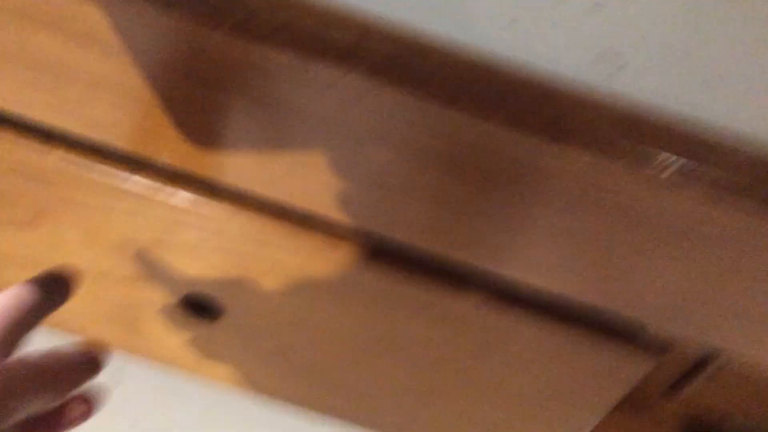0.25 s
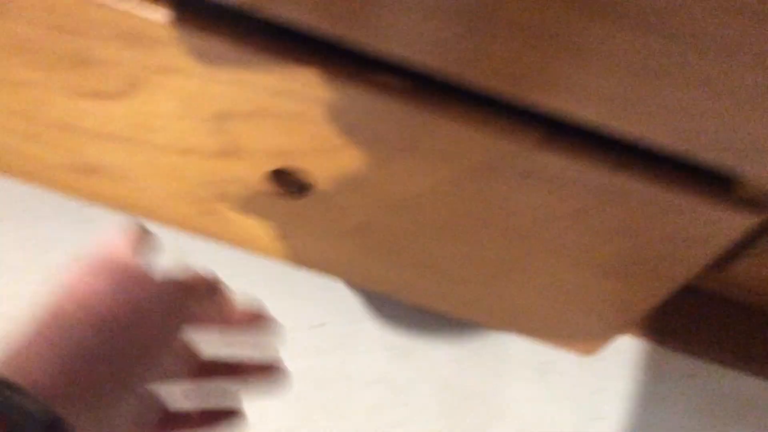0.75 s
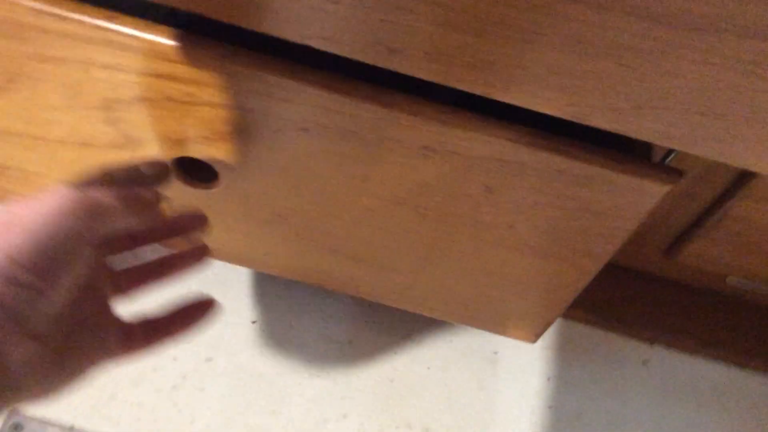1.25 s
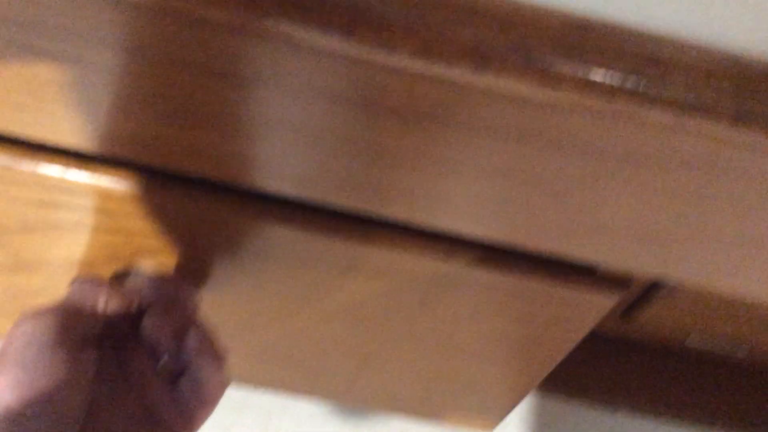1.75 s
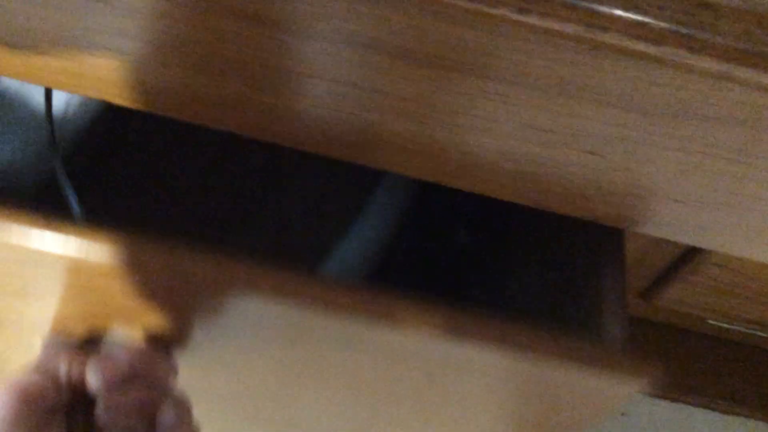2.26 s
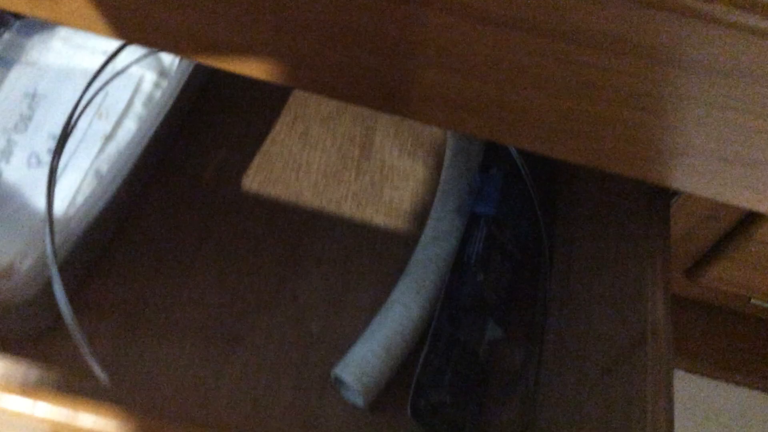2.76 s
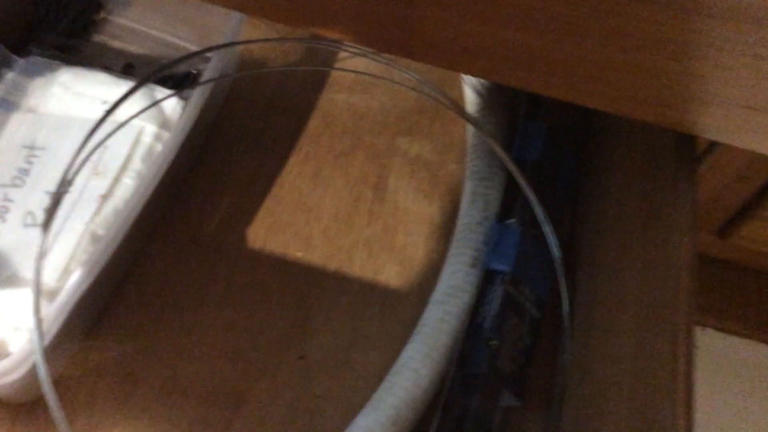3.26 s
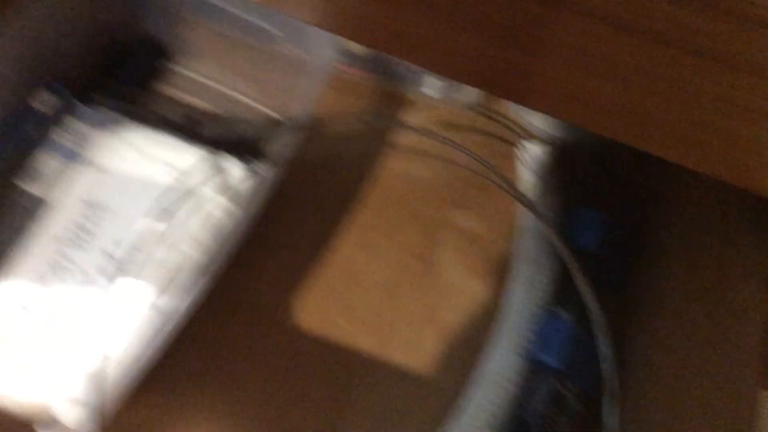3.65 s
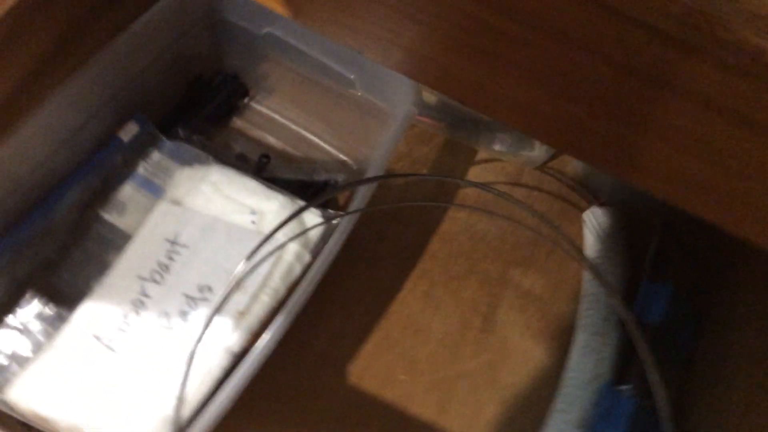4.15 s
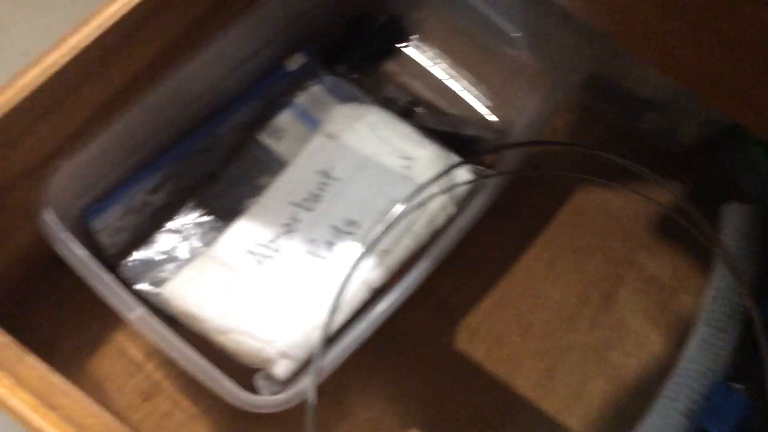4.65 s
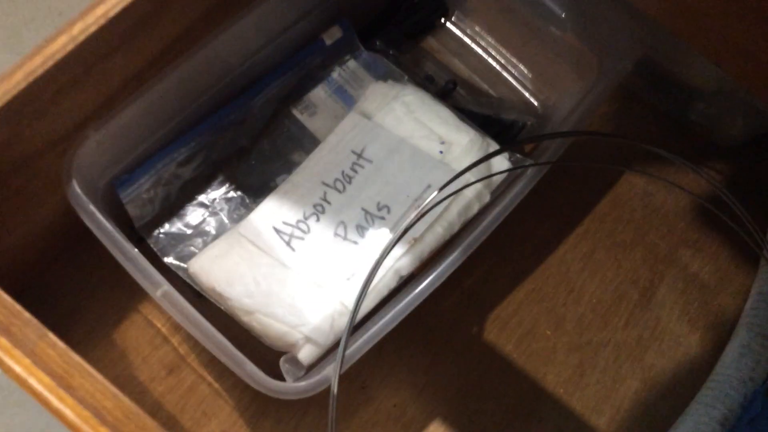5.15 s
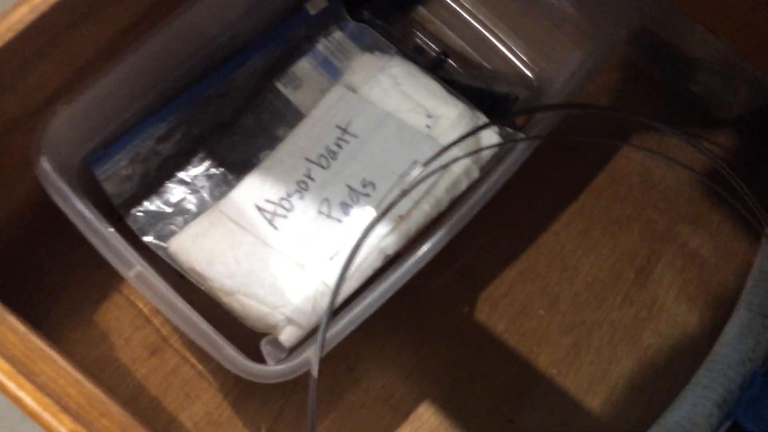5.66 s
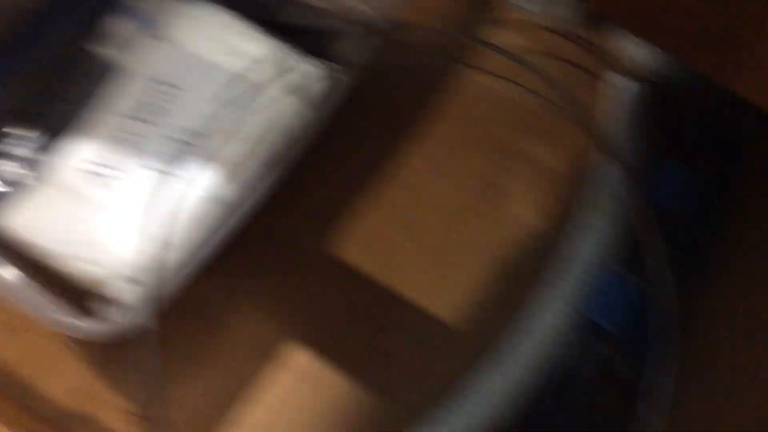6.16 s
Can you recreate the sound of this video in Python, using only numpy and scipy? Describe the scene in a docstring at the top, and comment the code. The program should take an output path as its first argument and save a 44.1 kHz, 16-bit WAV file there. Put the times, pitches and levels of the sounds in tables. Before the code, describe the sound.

Over a faint hum, a footstep and tiny shoe squeak, then a wooden drawer rattles, scrapes open in two pulls and bumps hard at its stop.

```python
"""Air noise, a faint mains hum and whirr (noise, sine, narrow noise bands) lie under all of a boat cabin.
First a footfall booms the floor and a shoe squeaks, a rising rough tone. A wooden drawer's latch rattles;
the drawer slides out in two pulls, as random slips in wood and hiss, with knocks ringing its box modes
and loose contents rattling. It bumps its stop and the small knocks die away; a last rustle follows."""
import sys
import numpy as np
from scipy import signal
from scipy.fft import rfft, irfft
from scipy.io import wavfile
from scipy.ndimage import uniform_filter1d

SR = 44100
rng = np.random.default_rng(int(sys.argv[2]) if len(sys.argv) > 2 else 0)


def to_wav(s):
    """Save 16-bit WAV."""
    ch = np.atleast_2d(s).T  # columns
    pcm = np.round(np.clip(ch, -1, 1) * 32767)  # PCM
    wavfile.write(sys.argv[1], SR, pcm.astype(np.int16))


N = 282240


def gain_of(db):
    """Decibels to gain."""
    return 10 ** (np.asarray(db) / 20)


def unit_rms(x):
    """Scales to rms 1."""
    return x / np.sqrt(np.mean(x ** 2) + 1e-20)


def read(points, hz):
    """Interpolates a table of values on a log-frequency axis."""
    f, value = np.transpose(points)
    return np.interp(np.log(hz + 1), np.log(f + 1), value)


def level(tables, column=1):
    """Gain along time: dB breakpoints joined by lines, silent outside each table."""
    t = np.arange(N) / SR
    gains = []
    for table in tables:
        columns = np.transpose(table)
        gains.append(gain_of(np.interp(t, columns[0], columns[column], -200, -200)))
    return uniform_filter1d(np.max(gains, axis=0), size=200)


def swells(rows, column=2):
    """Gain along time: each row rises and falls as one smooth arch."""
    t = np.arange(N) / SR
    return sum(gain_of(row[column]) * np.sin(np.pi * np.clip((t - row[0]) / row[1], 0, 1)) ** 2
               for row in rows)


def add(mix, start_s, sound):
    """Mixes a sound in at a given time."""
    part = mix[round(start_s * SR):][:len(sound)]
    part += sound[:len(part)]


def coloured(x, points):
    """Filters x by a spectrum table, rms 1."""
    hz = np.fft.rfftfreq(len(x), 1 / SR)
    return unit_rms(irfft(rfft(x) * gain_of(read(points, hz)), len(x)))


def resonate(x, hz, width_hz):
    """Two-pole resonance of peak gain about 1."""
    r = np.exp(-np.pi * width_hz / SR)
    g = (1 - r ** 2) / 2
    return signal.lfilter([g, 0, -g], [1, -2 * r * np.cos(2 * np.pi * hz / SR), r ** 2], x)


def slow_noise(n, samples):
    """Noise smoothed by two moving averages, rms 1."""
    noise = rng.standard_normal(n)
    return unit_rms(uniform_filter1d(uniform_filter1d(noise, samples), samples))


def flutter(spread_db, samples):
    """Slow random gain, normal in dB."""
    return gain_of(spread_db * slow_noise(N, samples))


def slips(per_s, spread_db):
    """Random stick-slip clicks of either sign, rms 1."""
    size = gain_of(spread_db * np.minimum(rng.exponential(1, N), 4)) * rng.choice([-1., 1.], N)
    return unit_rms(size * (rng.random(N) < per_s / SR))


def patchy(x, spread_db):
    """Lifts and lowers random patches of the sound, about 690 Hz by 81 ms, rms 1."""
    z = signal.stft(x, nperseg=512)[2]
    field = uniform_filter1d(rng.standard_normal(z.shape), size=8, axis=0)
    field = uniform_filter1d(field, size=14, axis=1)
    z = z * gain_of(spread_db * unit_rms(field))
    return unit_rms(signal.istft(z, nperseg=512)[1][:N])


# air noise spectrum: f/Hz, relative density/dB per Hz
AIR_SPECTRUM = [(25, -34.5), (55, -7), (86, -12.5), (150, -14.5), (200, -4.5), (364, -11), (480, -14.5),
                (632, -11.5), (1160, -15.5), (2000, -19.5), (4000, -26), (6000, -35.5), (10000, -34),
                (16000, -36.5)]
# whirr lines: f/Hz, width/Hz, level/dB
WHIRR_LINES = [(188.2, 11, -66), (324, 11, -77), (451, 8, -78.5), (560, 10, -79.5), (586.3, 19, -72),
               (745, 10, -77.5), (810, 20, -87.5), (975, 10, -77.5), (1197, 10, -80)]
# high rustle: start t/s, length/s, peak level/dB
RUSTLE_SWELLS = [(-.16, 0.44, -51.5), (-.1, 1, -63), (.85, 0.79, -61), (1.3, .8, -68), (3.82, .04, -60),
                 (6.15, 0.24, -65)]
# rustle spectrum: f/Hz, relative density/dB per Hz
RUSTLE_SPECTRUM = [(1180, -39), (2000, -3), (2200, -7), (3090, 0), (6420, -1), (9010, 4), (14200, 3.5),
                   (16000, 8)]
AIR_DB, HUM_HZ, HUM_DB = -64, 119, -66.5


def background():
    """Filtered air noise, a sine of mains hum, narrow wavering noise bands and a high noise rustle."""
    air_noise, whirr_noise, rustle_noise = rng.standard_normal((3, N))
    air = gain_of(AIR_DB) * coloured(air_noise, AIR_SPECTRUM) * flutter(0.626, samples=3000)
    sine = np.sqrt(2) * np.sin(2 * np.pi * HUM_HZ * np.arange(N) / SR)  # rms 1
    hum = gain_of(HUM_DB) * sine * flutter(.3, samples=6000)
    whirr = sum(gain_of(db) * unit_rms(resonate(whirr_noise, hz, width_hz))
                for hz, width_hz, db in WHIRR_LINES)
    rustle = swells(RUSTLE_SWELLS) * coloured(rustle_noise, RUSTLE_SPECTRUM)
    return air + hum + whirr + rustle


# floor boom spectrum: f/Hz, relative density/dB per Hz
FLOOR_SPECTRUM = [(22, -25.5), (40, 3), (62, 2.5), (100, -4.5), (180, -13.5), (300, -12), (700, -36)]
# thuds on the floor: peak t/s, level/dB, t60/s
FLOOR_THUDS = [(0.133, -41.5, 0.64), (0.174, -47, 1), (.32, -54, 0.3), (3.07, -37.5, .2), (3.3, -62, .4),
               (3.81, -45, 0.089), (4.682, -22.5, 0.3), (4.97, -67, 0.64)]
THUD_RISE_S, FLOOR_IDLE_DB, FLOOR_RE_SLIDE_DB = 0.021, -81, -27


def floor():
    """Low noise booms with each thud, follows the slide faintly and never quite rests."""
    t = np.arange(N) / SR
    shake = gain_of(FLOOR_IDLE_DB) + gain_of(FLOOR_RE_SLIDE_DB) * level(SLIDE_PULLS)
    for peak_s, db, t60_s in FLOOR_THUDS:
        rise = np.clip(1 + (t - peak_s) / THUD_RISE_S, 0, 1) ** 2
        shake += rise * gain_of(db - 60 * np.maximum(t - peak_s, 0) / t60_s)
    return shake * coloured(rng.standard_normal(N), FLOOR_SPECTRUM)


# squeak harmonics from the fundamental up: relative level/dB
SQUEAK_HARMONICS = [-0.5, -13, -21.5]
SQUEAK_START_S, SQUEAK_LENGTH_S, SQUEAK_LOW_HZ, SQUEAK_HIGH_HZ = .303, .049, 2300, 3980
SQUEAK_DB, SWELL_LEAN = -31, 1.25  # lean > 1: swell peaks late


def squeak():
    """Rubber slips ever faster on the floor: a rough harmonic glide levels off under one swell."""
    t = np.arange(0, SQUEAK_LENGTH_S, 1 / SR)
    u = t / SQUEAK_LENGTH_S
    hz = SQUEAK_LOW_HZ + (SQUEAK_HIGH_HZ - SQUEAK_LOW_HZ) * np.sin(np.pi / 2 * u) ** 1.3
    wobble, rasp = slow_noise(len(t), 36), slow_noise(len(t), 36)
    turns = np.cumsum(hz * (1 + .045 * wobble)) / SR
    tone = sum(gain_of(db) * np.sin(2 * np.pi * (k + 1) * turns) for k, db in enumerate(SQUEAK_HARMONICS))
    swell = np.sin(np.pi * u ** SWELL_LEAN)
    out = np.zeros(N)
    add(out, SQUEAK_START_S, gain_of(SQUEAK_DB) * swell * tone * (1 + .45 * rasp))
    return out


# latch and loose contents: t/s, clatter level/dB, ring level/dB, ring f/Hz, treble lift/dB
# (levels before the burst envelope)
RATTLE_HITS = [(1.7608, -56, -70, 2020, -13), (1.7867, -44.5, -52.5, 1650, -10),
               (1.786, -62, -63, 2990, -10), (1.795, -53, -51, 1640, -10), (1.8238, -49, -56, 856, -11),
               (1.8494, -55, -48, 740, -6), (1.9001, -39, -42.5, 1250, -2.5), (1.9124, -48, -42, 708, -14),
               (1.957, -39, -47, 710, 7), (1.9714, -40, -46, 890, -20), (3.016, -64, -31, 846, -2),
               (3.024, -55, -42, 1190, -8), (3.2704, -59, -42, 710, -9), (3.7994, -47.5, -45.5, 1080, 1),
               (3.8394, -74, -47.5, 750, 6), (3.8883, -50, -53, 1510, -15), (3.901, -72, -76, 2520, -25),
               (3.9369, -54, -55, 1510, -13), (4.3473, -59, -57, 1070, -16), (4.4094, -60, -52, 760, -8),
               (4.6568, -45, -18.5, 866, -5), (4.6757, -35, -22.5, 923, -8.5), (4.6994, -37, -32, 908, 0.5),
               (4.7227, -27, -30, 1260, -28), (4.7394, -49, -25, 720, -32), (4.756, -47, -27, 790, -26),
               (4.7842, -41.5, -38.5, 1084, -6), (4.8094, -48, -51, 740, -5), (4.8334, -48, -37, 767, -2)]
# modes of latch and small parts: f/Hz, relative level/dB, width/Hz
PART_MODES = [(695, 7, 31), (881, 6.5, 180), (1060, -6.5, 69.2), (1226, 4, 89), (1632, -12, 24),
              (1930, -12, 58), (2502, -3.5, 120), (3100, 17.5, 150), (3750, -4.5, 230), (5300, -2, 250)]
# clatter spectrum: f/Hz, relative density/dB per Hz
CLATTER_SPECTRUM = [(400, -24), (900, 10), (2000, 12), (3200, 7), (4500, 0), (8000, -13.5), (16000, -30.5)]
RATTLE_T60_S, RATTLE_RISE_S, NEARNESS_DB_PER_OCTAVE = 0.097, 0.002, 36


def rattles():
    """Noise bursts, as of tiny collisions, ring the small-part modes near one pitch over a clatter."""
    out, t = np.zeros(N), np.arange(SR // 8) / SR
    envelope = gain_of(-60 * t / RATTLE_T60_S) * (1 - np.exp(-t / RATTLE_RISE_S))
    high_pass = signal.butter(2, 5000, "high", fs=SR)
    for start_s, clatter_db, ring_db, centre_hz, treble_db in RATTLE_HITS:
        noise = rng.standard_normal(len(t))
        ring = np.zeros(len(t))
        for hz, db, width_hz in PART_MODES:
            near_db = -NEARNESS_DB_PER_OCTAVE * abs(np.log2(hz / centre_hz))
            ring += gain_of(db + near_db) * unit_rms(resonate(noise, hz, width_hz))
        clatter = coloured(noise, CLATTER_SPECTRUM)
        treble = signal.filtfilt(*high_pass, clatter)
        clatter = clatter + (gain_of(treble_db) - 1) * treble
        burst = gain_of(clatter_db) * clatter + gain_of(ring_db) * unit_rms(ring)
        add(out, start_s, burst * envelope)
    return out


# two pulls along the runners: t/s, wood rumble level/dB, scrape hiss level/dB
SLIDE_PULLS = [
    [(2.02, -67, -73), (2.13, -56, -56.5), (2.21, -49.5, -53), (2.54, -50, -51.5), (2.82, -53.5, -52),
     (2.95, -47, -49.5), (3.15, -50, -51.5), (3.25, -49, -58), (3.32, -52, -62)],
    [(3.32, -55, -64.5), (3.42, -53, -58), (3.48, -52, -52), (3.6, -51.5, -55), (3.78, -55, -61),
     (3.84, -46.5, -70), (3.87, -57, -92), (3.95, -67, -107)],
]
# rubs of foot, finger and settling load on wood: start t/s, length/s, rumble peak/dB, hiss peak/dB
WOOD_RUBS = [(.1, 0.47, -60, -92), (1.35, 0.39, -65, -67), (1.78, 0.28, -52.5, -70),
             (4.258, 0.051, -71, -57), (4.38, .06, -61, -58), (4.6, 0.069, -48, -69),
             (4.8, 0.058, -52, -81), (4.94, 0.16, -73, -97)]
# scrape spectrum: f/Hz, relative density/dB per Hz
SCRAPE_SPECTRUM = [(290, -35), (500, -2), (562, -21.5), (906, 2), (1510, -5), (1620, -7), (2130, -6.5),
                   (3250, -3), (9090, -8.5), (13400, -11.5), (16000, -32.5)]
# thin rings in the scrape: f/Hz, width/Hz, relative level/dB
SCRAPE_RINGS = [(1690, 26, 4.5), (3150, 123.6, -4.5), (3760, 150, -6.5), (5580, 1000, -10)]


def slide():
    """Slips along the runners shake the box modes and make a patchy hiss."""
    coarse = slips(per_s=900, spread_db=0)
    rumble = np.zeros(N)
    for (hz, db, t60_s), tilt_db in zip(BOX_MODES, np.linspace(3, -6, len(BOX_MODES))):
        rumble += gain_of(db + tilt_db) * resonate(coarse, hz, 4.7 / t60_s)
    rumble = unit_rms(rumble) * flutter(2.3, samples=500)
    fine = slips(per_s=4900, spread_db=-1.5)
    rings = sum(gain_of(db) * flutter(2.1, samples=3500) * resonate(fine, hz, width_hz)
                for hz, width_hz, db in SCRAPE_RINGS)
    hiss = patchy(coloured(fine + rings, SCRAPE_SPECTRUM), spread_db=1.5)
    hiss = hiss * flutter(0.64, samples=300) * flutter(0.41, samples=1500)
    rumble_gain = level(SLIDE_PULLS) + swells(WOOD_RUBS)
    hiss_gain = level(SLIDE_PULLS, column=2) + swells(WOOD_RUBS, column=3)
    return rumble_gain * rumble + hiss_gain * hiss


# drawer on its frame: t/s, peak level/dB, struck spot f/Hz, spread/octaves, ring/factor on t60
DRAWER_KNOCKS = [(0.476, -52, 170, 0.18, 1.3), (1.398, -52.5, 227, 0.17, 1.8),
                 (1.397, -51.5, 694, 0.079, 1.1), (1.455, -54, 693, 0.093, 2),
                 (1.789, -43, 1600, .08, 0.63), (1.8, -49, 204, 0.079, 1.7),
                 (2.207, -39.5, 127, 0.34, 0.36), (2.249, -36, 294, 0.75, 0.25),
                 (2.333, -33.5, 350, 0.37, 0.42), (2.352, -31.5, 187, 0.48, 0.16),
                 (2.501, -41, 201, 0.16, 4.1), (2.538, -44, 288, 0.56, .82), (3.014, -21, 318, 0.6, 0.57),
                 (3.027, -17.5, 184, 0.63, 0.19), (3.043, -20, 396, 0.76, 0.27),
                 (3.072, -27.5, 174, 0.76, 0.31), (3.271, -35, 580, 0.43, 0.6),
                 (3.281, -30, 177, 0.095, 0.93), (3.28, -20.5, 220, 0.65, 0.29),
                 (3.803, -27.5, 197, 0.34, 0.29), (3.814, -25.5, 142, 0.61, 0.18),
                 (4.388, -45, 398, 0.15, 1), (4.405, -39, 178, 0.27, 0.27), (4.408, -41, 420, 0.13, .59),
                 (4.42, -41.5, 430, 0.087, 0.66), (4.656, -6, 374.5, 0.14, 0.4), (4.662, -7, 435, .4, 0.23),
                 (4.679, -16, 250, 0.42, 0.94), (4.686, -16, 540, 0.13, 0.24),
                 (4.695, -19, 193, 0.29, 0.69), (4.71, -24, 194, 0.22, 0.54),
                 (4.738, -12.5, 364, 0.1, 0.24), (4.744, -14.5, 416, 0.67, 0.33),
                 (4.759, -27, 286, .4, 1.5), (4.773, -25, 187, 0.54, 0.21), (4.796, -20, 359, 0.22, 0.27),
                 (4.815, -27.5, 200, 0.53, 0.23), (4.825, -22.5, 290, 0.5, 0.2),
                 (4.863, -45.5, 100, 0.44, 0.35), (4.961, -50.5, 94, 0.72, 0.64)]
# drawer box modes, also shaken by the slide: f/Hz, relative level/dB, t60/s (before the ring factor)
BOX_MODES = [(66, -16.5, 0.3), (102.5, -4.5, 0.74), (129, 5.5, 0.24), (182.6, 3, 0.3), (202.6, 5, 0.13),
             (262.5, 2, 0.13), (292.6, 7.5, 0.081), (356, 0.5, 0.084), (435.2, -2.5, 0.24),
             (488.5, -3.5, 0.29), (524, -5.5, 0.14), (634, -3, 0.092), (699, -12.5, .1), (770, -1.5, .08),
             (800, -26.5, 0.042), (894, -11, 0.18), (975, -14.5, 0.085), (1183, -5.5, 0.051),
             (1385, -17.5, 0.04), (1543, -12, 0.19)]


def knocks():
    """Each blow rings the modes near the pitch of its spot; a soft contact rounds the start."""
    out, t = np.zeros(N), np.arange(SR // 4) / SR
    hz, mode_db, t60_s = np.transpose(BOX_MODES)[:, :, None]
    for start_s, peak_db, spot_hz, spread, ring in DRAWER_KNOCKS:
        away = np.log2(hz / spot_hz) / max(spread, .04)
        near_db = np.maximum(-9 * away ** 2, -24 - 4.3 * abs(away))
        decay_db = -60 * t / (t60_s * max(ring, .1))
        modes = gain_of(mode_db + near_db + decay_db) * np.sin(2 * np.pi * hz * t)
        sound = modes.sum(axis=0) * (1 - np.exp(-.9 * spot_hz * t))
        add(out, start_s, gain_of(peak_db) * sound / abs(sound).max())
    return out


# cabin reverberation: f/Hz, t60/s
CABIN_T60 = [(150, 0.41), (1000, 0.26), (2600, 0.13), (3900, 0.26), (7500, .15), (12000, 0.31)]


def cabin(x):
    """Dense echoes of a small wooden room: a noise tail, each band dying at its own speed."""
    hz, t, z = signal.stft(rng.standard_normal(SR // 2), SR, nperseg=256)
    decay = gain_of(-60 * t / read(CABIN_T60, hz)[:, None])
    tail = signal.istft(z * decay, SR, nperseg=256)[1]
    tail = np.r_[np.zeros(90), tail]  # 2 ms delay
    return signal.fftconvolve(x, tail / np.linalg.norm(tail))[:N]


def scene():
    """Drawer and shoe with the room's answer, over the background; the shoe is further off."""
    bed = background() + floor()
    shoe = squeak()
    drawer = rattles() + slide() + knocks()
    wet = cabin(gain_of(-12) * drawer + shoe)  # more room on the shoe
    return (bed + shoe + drawer + wet)[None]


def record(dry):
    """The microphone's bass roll-off, then the band limit."""
    thin = signal.lfilter(*signal.butter(2, 45, "high", fs=SR), dry)
    band_limit = signal.firwin(511, 15850, window=("kaiser", 9), fs=SR)
    return signal.oaconvolve(thin, band_limit[None], "same")


dry = scene()
out = record(dry)
to_wav(out)
```